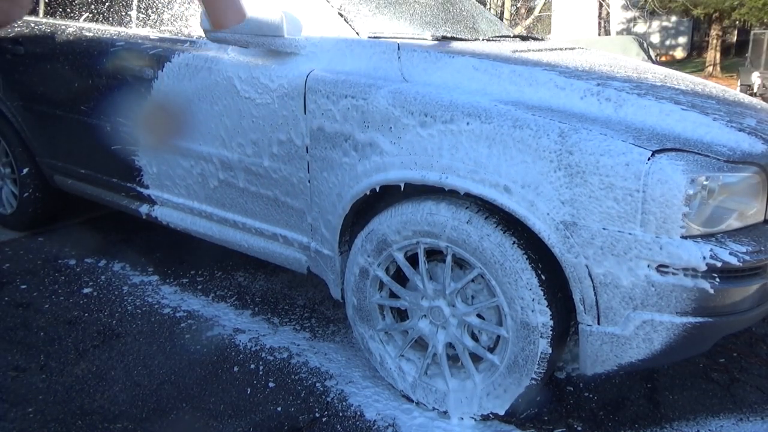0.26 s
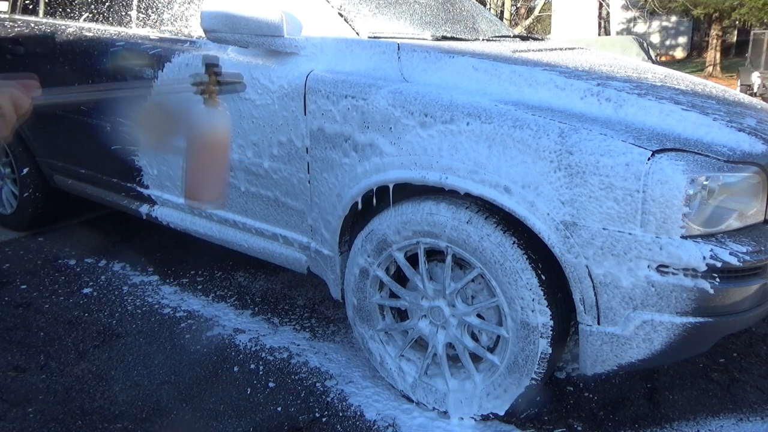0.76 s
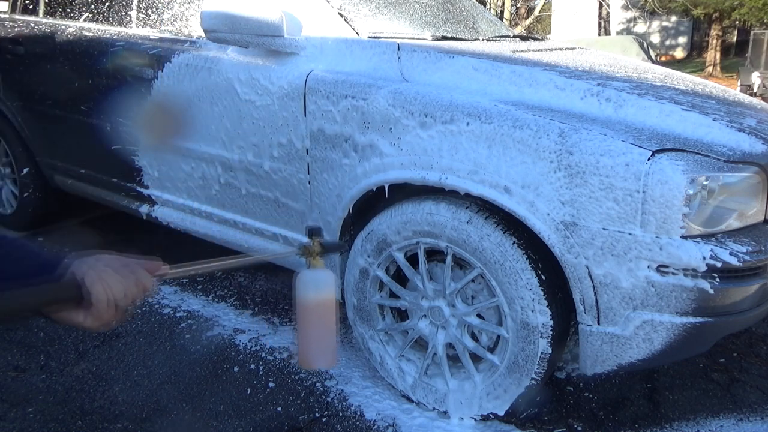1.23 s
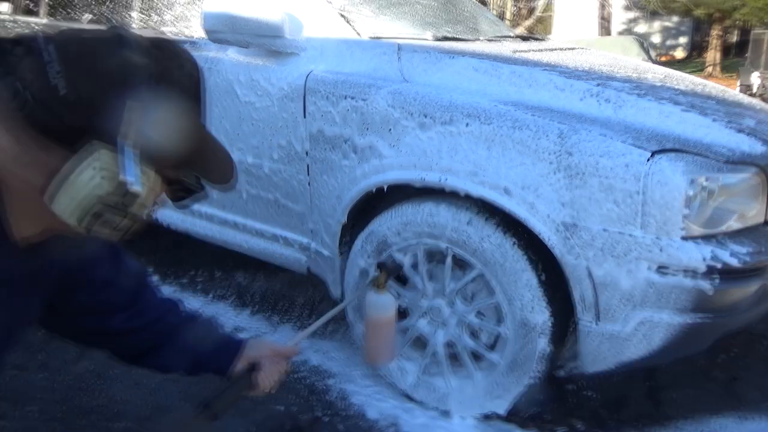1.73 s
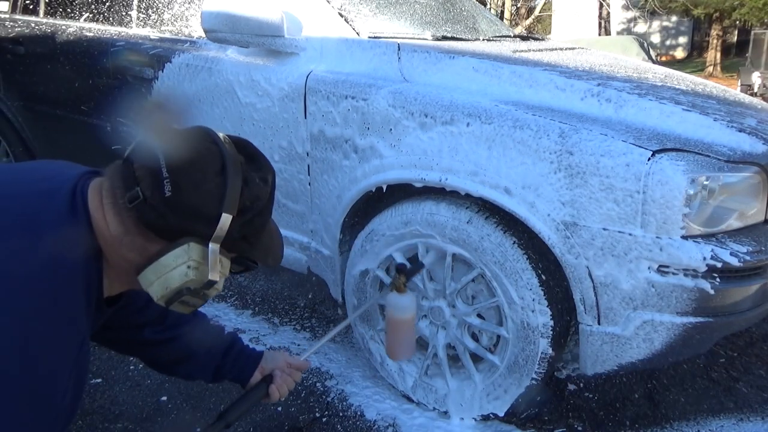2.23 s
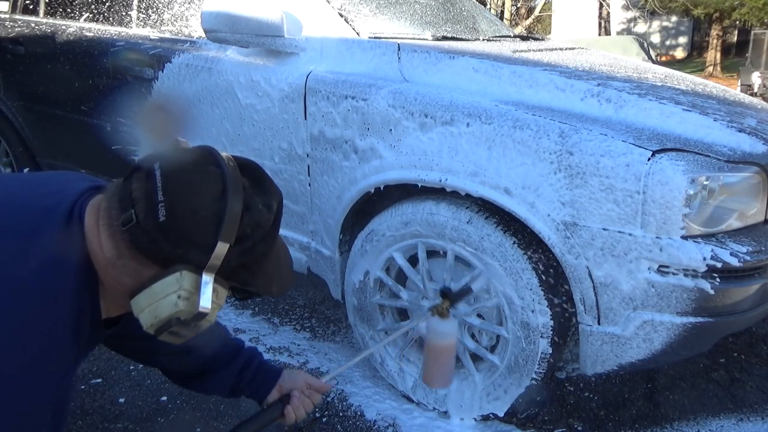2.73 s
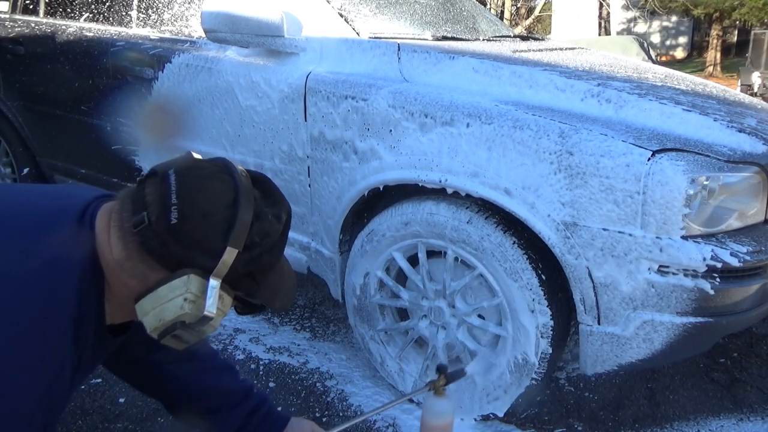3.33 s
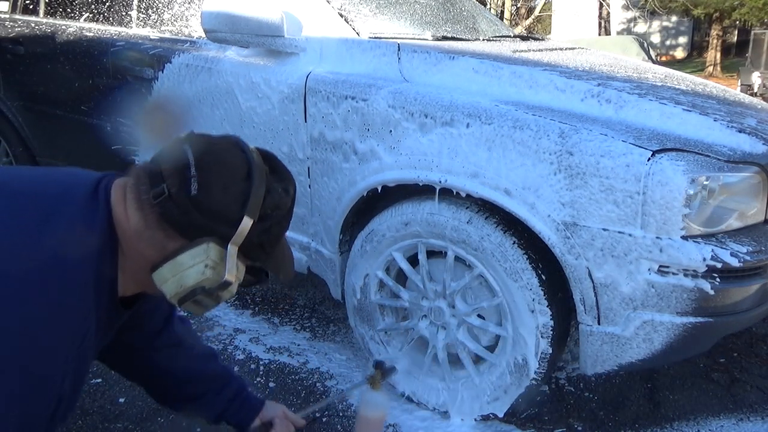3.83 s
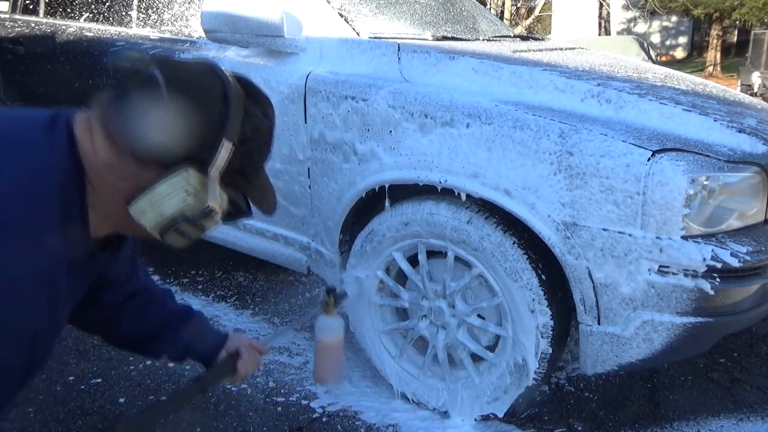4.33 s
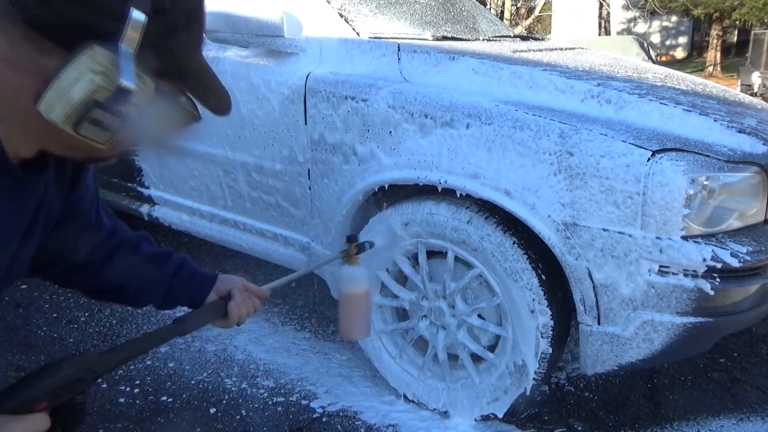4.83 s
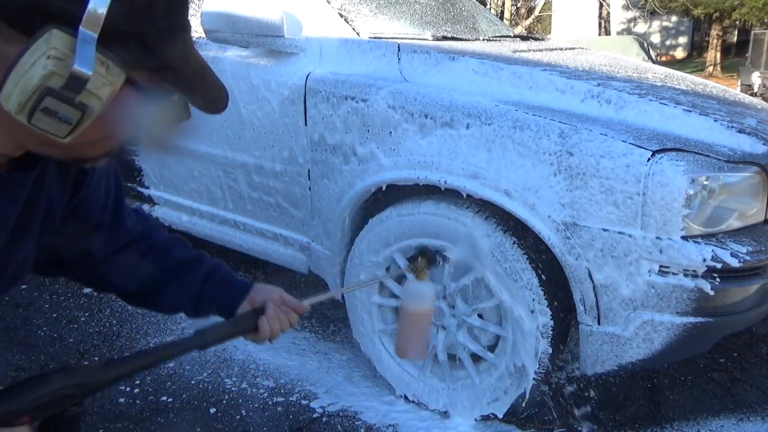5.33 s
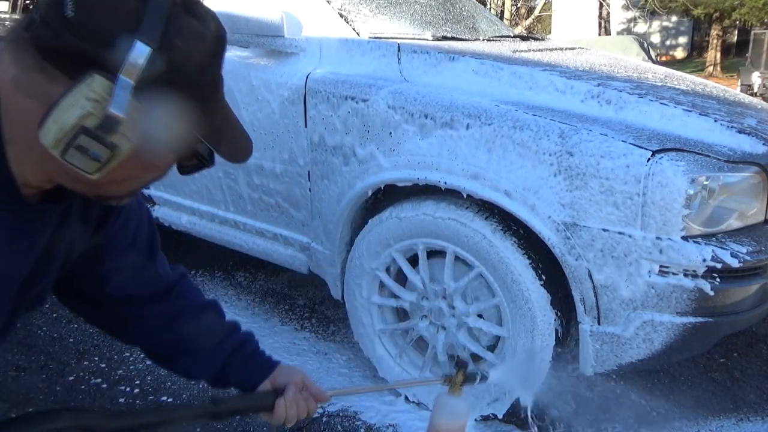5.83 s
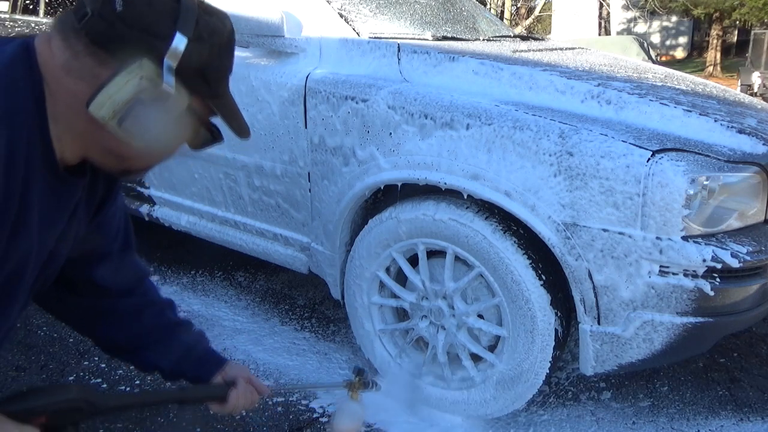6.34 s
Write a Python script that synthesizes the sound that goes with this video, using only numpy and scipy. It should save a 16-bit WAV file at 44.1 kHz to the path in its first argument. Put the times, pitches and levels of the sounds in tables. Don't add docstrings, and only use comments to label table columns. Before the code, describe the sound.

Outdoors and dry, close to a car wheel. From 0 to 1.8 s a small petrol engine driving a pressure washer buzzes a little to the left, firing about thirty times a second. Its speed hunts up and down roughly twice a second, with brief throttle dips near 0.1, 0.55 and 0.95 s, a small hissy sputter around 0.3 s, then steadies. At 1.82 s a hard plastic trigger clacks; instantly a loud, bright foam jet opens. The engine sags, recovers by about 2.4 s and holds slightly lower, duller and quieter behind the spray. The hiss lasts until the end at about 6.6 s, swelling in splashy strikes around 2.2, 3.0, 3.6, 4.3, 5.6 and 6.5 s, with small spits, an airy nozzle singing and short breathy whistles of sucked-in air. It drifts slightly left near 3 s, right near 5.7 s, then back to centre.

```python
import sys
import numpy as np
from scipy import signal
from scipy.fft import rfft, irfft, next_fast_len
from scipy.io import wavfile

SR = 44100
rng = np.random.default_rng(int(sys.argv[2]) if len(sys.argv) > 2 else 0)


def amplitude_ratio(level_db):
    exponent = np.asarray(level_db, float) / 20
    return 10 ** exponent


def generate_wav(sig):
    pcm = np.round(np.clip(np.atleast_2d(sig).T, -1, 1) * 32767).astype(np.int16)
    wavfile.write(sys.argv[1], SR, pcm)


N = 290178

# (multiple of firing rate [1], level [dB])
FREE_ORDERS = [(1, -35), (2, -23), (3, -18.5), (4, -2.5), (5, -2), (6, -14), (7, -4.5), (8, 0.5), (9, -4),
               (10, -10.5), (11, -7.5), (12, 4.5), (13, -15), (14, -4), (15, -14), (16, -2), (17, -10),
               (18, -6.5), (19, -18.5), (20, -9), (21, -14), (22, -21), (23, -20), (24, -8), (25, -22),
               (26, -8), (27, -14), (28, -13), (29, -8), (30, -21), (31, -15), (32, -8), (33, -25),
               (34, -4), (35, -24), (36, -19), (37, -12), (38, -0.5), (39, -9.5), (40, -3), (41, -15),
               (42, 0.5), (43, -16), (44, -7), (45, -10), (46, -12)]
LOADED_ORDERS = [(1, -37), (2, -24), (3, -36), (4, -10.5), (5, -6.5), (6, -12.5), (7, -11), (8, -6),
                 (9, -2.5), (10, -9.5), (11, -10.5), (12, 0.5), (13, -20), (14, -3), (15, -4), (16, -6.5),
                 (17, -7), (18, 4.5), (19, -8.5), (20, -6), (21, -4.5), (22, -2.5), (23, -11.5), (24, -5.5),
                 (25, -10.5), (26, -9), (27, -4), (28, -10), (29, -5.5), (30, -1.5), (31, -10.5), (32, -16),
                 (33, -13), (34, -8), (35, -13), (36, -12.5), (37, -16), (38, -6), (39, -21), (40, -4),
                 (41, -13), (42, -9), (43, -6.5), (44, -4), (45, -7.5), (46, -12)]
# (frequency [Hz], density [dB per Hz])
FREE_ROAR = [(40, -44), (100, -30), (200, -16), (400, -9), (800, 0), (1300, 0), (2100, -4), (3300, -9),
             (4700, -9), (5700, -11), (6700, -18), (8000, -15), (10200, -10), (16500, -12)]
LOADED_ROAR = [(40, -26), (100, -29), (200, -20), (400, -12), (800, -5), (1400, 1.5), (2200, 0.5),
               (2700, -3), (3500, -18), (5000, -28)]
JET = [(1500, -35), (2500, -11.5), (3270, -5.5), (4500, -7), (5700, -8), (6300, -11.5), (6750, -16),
       (7300, -9), (8500, -7.5), (10700, -4), (12500, -6.5), (14500, -11.5), (16500, -15)]
# (frequency [Hz], width [Hz], level [dB])
CASING = [
    (1280, 140, -3.5),
    (9920, 180, -11),
    (10400, 120, -13),
]
# (frequency [Hz], left minus right [dB])
ENGINE_BALANCE = [(60, 5), (110, -6.5), (200, 1.5), (380, 4.5), (700, 4), (1290, 5), (2380, 6.5), (4400, 3),
                  (8120, 0), (15000, -0.5)]
LOADED_BALANCE = [(60, 1), (130, -0.5), (290, 1.0), (640, 2.5), (1410, 3.5), (3100, -1), (6820, 2),
                  (15000, 0.0)]
# (frequency [Hz], likeness [0-1])
ENGINE_LIKENESS = [(60, .95), (130, .93), (290, 1), (640, 0.62), (1410, 0.74), (3100, 0.96), (6820, 0.73),
                   (15000, 0.99)]
LOADED_LIKENESS = [(60, 0.93), (300, 0.94), (700, 0.77), (1400, 0.91), (2000, 0.96), (2700, 0.9)]
JET_LIKENESS = [(2500, 0.99), (16000, 1)]
# (time [s], rate over loaded speed [Hz])
SAG = [
    (1.84, 1.8),
    (1.92, .75),
    (1.97, 0),
    (2.01, -1.25),
    (2.06, -1.65),
    (2.14, -.9),
    (2.22, -.1),
    (2.3, .3),
    (2.47, 0),
]
# (time it reopens [s], closing time [s], closure [0-1])
THROTTLE_SHUTS = [
    (.12, 0.096, 1.01),
    (.55, 0.095, 0.76),
    (.96, 0.048, 0.7),
    (1.45, .1, 0.1),
]
# (time [s], level [dB])
ENGINE_GAIN = [(0, -28.5), (.45, -28), (1.0, -26.5), (1.81, -24), (1.84, -31.5), (2.4, -29.5), (2.8, -31),
               (3.55, -31), (3.68, -28.5), (3.76, -30.5), (4.1, -32), (5.8, -32), (6.58, -30.5)]
# (time [s], hold [s], change [dB])
DUCKS = [
    (0.132, 0.14, -2),
    (1.829, 0.032, -2),
    (2.009, .19, -5),
    (2.473, 0.028, -9),
]
# (time [s], half length [s], rise [dB])
SPUTTERS = [
    (0.31, 0.0055, 3),
    (0.343, .007, 8),
    (.796, 0.0099, 1.5),
]
# (frequency [Hz], level [dB], decay time t60 [s])
TRIGGER_MODES = [
    (1400, -14, .03),
    (1950, -20, .018),
    (4200, -20, .012),
]
# (time [s], hiss level [dB], top of the hiss over it [dB])
FLOW = [(1.86, -17, -7.5), (1.89, -18.5, -5), (2.02, -16.5, -7), (2.66, -18, -8), (2.75, -16, -12),
        (3.11, -18, -7.5), (3.69, -18.5, -8), (3.77, -16.5, -8), (4.57, -18.5, -5), (4.91, -17, -7),
        (6.07, -20, -6.5), (6.08, -19, -8), (6.58, -19.5, -4)]
# (time [s], left minus right [dB])
SWEEP = [(2.6, 1), (3.2, 2), (3.8, 0), (5.3, 0.5), (5.55, -1.8), (5.85, -1.9), (6.2, -1.3), (6.45, 0)]
# (time of peak [s], build-up [s], level [dB], centre [Hz])
STRIKES = [(2.19, 0.3, -27, 4900), (2.5, 0.036, -32, 4900), (2.7, 0.12, -39, 5440), (3.0, 0.36, -26, 4700),
           (3.62, 0.34, -32, 5430), (3.9, 0.13, -34, 5370), (4.319, 0.2, -32, 4630),
           (4.52, 0.051, -39, 5250), (5.15, 0.45, -35.5, 5070), (5.62, 0.21, -31.5, 5000),
           (6.0, 0.094, -39, 5340), (6.5, 0.38, -30.5, 5340)]
# (time [s], half length [s], level [dB], centre [Hz])
GULPS = [(1.978, 0.018, -40, 2130), (2.3, .07, -42, 2120), (2.45, 0.028, -37, 2160),
         (2.61, 0.072, -32, 2130), (2.875, 0.1, -33, 2170), (3.1, .04, -41, 2090), (3.22, 0.033, -30, 2190),
         (3.57, 0.17, -33.5, 2160), (3.72, .04, -36, 2170), (4.032, 0.057, -30, 2220),
         (4.16, .05, -34, 2160), (4.43, 0.1, -33.5, 2170), (4.68, .06, -35, 2160), (4.8, .04, -40, 2140),
         (5.02, .025, -37, 2080), (5.17, 0.036, -35, 2090), (5.28, .03, -39, 2130),
         (5.52, 0.12, -31.5, 2180), (5.98, 0.037, -30, 2150), (6.14, .02, -44, 2060),
         (6.37, 0.19, -34, 2200)]
# (time [s], half length [s], level [dB], centre [Hz])
NOZZLE = [(2.12, .12, -35, 5700), (2.45, .04, -33, 5570), (2.67, .08, -35, 5750), (2.9, .1, -36, 5900),
          (3.05, .05, -39, 5700), (3.36, .08, -36, 6130), (3.52, 0.065, -34, 5500), (3.82, .04, -34, 5800),
          (4.0, .1, -34, 5800), (4.25, .08, -35, 5660), (4.5, .04, -39, 5670), (4.8, .1, -43, 5800),
          (5.1, 0.074, -39, 5900), (5.35, .08, -42, 5570), (5.58, 0.059, -37, 5560), (5.95, .06, -37, 5660),
          (6.3, .1, -35, 6000), (6.55, .06, -33, 5800)]
# (time [s], half length [s], level [dB], centre [Hz])
SPITS = [(2.2, 0.055, -34, 3900), (2.49, 0.017, -31, 4350), (2.79, .07, -34, 5200), (2.89, .05, -34, 4730),
         (3.0, .06, -35, 3900), (3.25, .04, -40, 4800), (3.65, 0.046, -32, 3900), (4.05, 0.045, -38, 4500),
         (4.26, .03, -36, 4750), (4.315, .025, -32, 3900), (4.95, .05, -45, 4000), (5.2, .06, -39, 4500),
         (5.62, .04, -39, 4800), (6.2, .06, -42, 5300), (6.4, .05, -42, 4300)]

TRIGGER_S, JET_OPENS_S = 1.817, 1.832
FREE_HZ, HUNT_HZ, HUNT_PERIOD_S, HUNT_FADES_S, FASTEST_S = 30.75, 1.9, .455, .85, .415
LOADED_HZ, CREEP_HZ_PER_S = 28.95, .075
A_FIRING_S, A_PUMP_STROKE_S = 1.421, 5.104
EXHAUST_FREE_DB, EXHAUST_LOADED_DB = 0.24, -4
DEEP_DB, DEEP_RISE_DB_PER_S = -57.5, 4.5
RAGGED_DB, SETTLED_DB, SETTLES_S = -7, -12.5, 0.88
SHUT_EXHAUST_DB, SHUT_DEEP_DB, SHUT_RAGGED_DB, SHUT_NOTE_DB, SHUT_BYPASS_DB = -2.5, 15, 9, -8, 3
SOFT_DB, FIRMS_S, CHOKE_DB, CHOKE_ENDS_S = -3.5, 0.35, -3, 1.9
BYPASS_DB, BYPASS_FOLLOWS, BYPASS_FLUTTER_DB = -26, 0.68, 1.37
DUCK_ATTACK_S, DUCK_RELEASE_S, DUCK_BASS_SHARE = .015, 0.028, 1.28
REOPEN_SHARE, LEAVE_SHARE = 0.37, 0.18
SPLASH_DB, SPLASH_FOLLOWS, STRIKE_FLOOR_DB = -41.5, 0.35, -44
GULP_FLOOR_DB, WHISTLE_WIDTH_HZ = -53, 170
NOZZLE_FLOOR_DB, NOZZLE_WIDTH_HZ, SPIT_FLOOR_DB, SPIT_WIDTH_HZ = -42, 600, -49, 800


def in_time(rows):
    s, *columns = np.transpose(rows)
    return [np.interp(np.arange(N) / SR, s, column) for column in columns]


def at_hz(points, hz):
    table_hz, values = np.array(points).T
    return np.interp(np.log(hz), np.log(table_hz), values)


def rms_one(x):
    return x / np.sqrt(np.mean(x ** 2))


def drift(rate):
    r = np.exp(-80 * np.pi * rate / SR)
    white = rng.standard_normal(N // 40 + 2002)
    slow = signal.lfilter([1], [1, -2 * r, r * r], white)[2000:]
    return np.interp(np.arange(N) / 40, np.arange(len(slow)), rms_one(slow))


def step_at(s, rise_s):
    return np.clip((np.arange(N) / SR - s) / rise_s, 0, 1)


def bumps(s, half_s, height, fall=1):
    t = np.arange(0, N + 64, 64) / SR
    away = (t - s[:, None]) / half_s[:, None]
    rows = height[:, None] * np.exp(-np.where(away > 0, away / fall, away) ** 2)
    return np.interp(np.arange(N) / SR, t, rows.sum(axis=0))


def swells_db(rows, floor_db, fall=1):
    s, half_s, peak_db = np.transpose(rows)[:3]
    return 10 * np.log10(amplitude_ratio(2 * floor_db) + bumps(s, half_s, amplitude_ratio(2 * peak_db), fall))


def noise(spectrum, levels, likeness, balance, shared_db, patchy_db, count=N):
    size = next_fast_len(count)
    hz = np.maximum(np.arange(size // 2 + 1) * SR / size, 1)
    shape = amplitude_ratio(at_hz(spectrum, hz)) * (hz > spectrum[0][0]) * (hz < spectrum[-1][0])
    mid, side = rfft(rng.standard_normal((2, size))) * shape
    alike = np.clip(at_hz(likeness, hz), 0, 1)
    lean_db = at_hz(balance, hz) / 2
    common, differing = np.sqrt(1 + alike) * mid, np.sqrt(1 - alike) * side
    pair = np.array([amplitude_ratio(sign * lean_db) * (common + sign * differing) / np.sqrt(2) for sign in (1, -1)])
    curves, anchors = [], []
    for low, high, db in levels:
        power = np.sum(shape[(hz > low) & (hz < high)] ** 2) * 2 / size
        curves.append(db - 10 * np.log10(power))
        anchors.append(np.log(np.sqrt(low * high)))
    out = 0
    for centre in np.arange(np.log2(spectrum[0][0]), np.log2(spectrum[-1][0]) + .6, 2 / 3):
        window = np.clip(1 - np.abs(np.log2(hz) - centre) * 1.5, 0, 1)
        weights = [np.interp(centre * np.log(2), anchors, row) for row in np.eye(len(levels))]
        blend_db = sum(w * curve for w, curve in zip(weights, curves))
        level_db = blend_db + shared_db + patchy_db * drift(16)
        out = out + amplitude_ratio(level_db[:count]) * irfft(window * pair, size)[:, :count]
    return np.pad(out, [(0, 0), (0, N - count)])


def resonance(x, hz, width):
    r, out, state = np.exp(-np.pi * width / SR), np.zeros(N), np.zeros(2)
    size = 512 if np.ndim(hz) else N
    hz = np.broadcast_to(hz, N)
    b = np.array([1, 0, -1]) * (1 - r * r) / 2
    for i in range(0, N, size):
        a = [1, -2 * r * np.cos(2 * np.pi * hz[i] / SR), r * r]
        out[i:i + size], state = signal.lfilter(b, a, x[i:i + size], zi=state)
    return out


def resonant_air(hz, width, second_width):
    once = resonance(rng.standard_normal(N), hz, width)
    return rms_one(resonance(once, hz, second_width))


def speed():
    t = np.arange(N) / SR
    swing = np.exp(-t / HUNT_FADES_S) * np.cos(2 * np.pi * (t - FASTEST_S) / HUNT_PERIOD_S)
    free = FREE_HZ + HUNT_HZ * swing * step_at(0, 0.195)
    loaded = LOADED_HZ + CREEP_HZ_PER_S * (t - 1.88) + in_time(SAG)[0]
    return np.where(t < SAG[0][0], free, loaded)


def firings():
    turns = np.cumsum(speed()) / SR
    return turns - turns[round(A_FIRING_S * SR)]


def engine_levels():
    gain_db, = in_time(ENGINE_GAIN)
    duck_db = 0
    for s, hold_s, db in DUCKS:
        duck_db = duck_db + db * (step_at(s, DUCK_ATTACK_S) - step_at(s + hold_s, DUCK_RELEASE_S))
    shut = bumps(*np.transpose(THROTTLE_SHUTS), REOPEN_SHARE)

    over_db = np.where(np.arange(N) < TRIGGER_S * SR, EXHAUST_FREE_DB, EXHAUST_LOADED_DB)
    low_db = gain_db + over_db + DUCK_BASS_SHARE * duck_db + SHUT_EXHAUST_DB * shut
    note_db = low_db + SHUT_NOTE_DB * shut
    choke = step_at(TRIGGER_S, 0.022) - step_at(CHOKE_ENDS_S, 0.032)
    upper_db = SOFT_DB * (1 - step_at(0, FIRMS_S)) + CHOKE_DB * choke
    casing_db = gain_db + duck_db
    bypass_db = BYPASS_DB + BYPASS_FOLLOWS * (gain_db + 27) + duck_db + BYPASS_FLUTTER_DB * drift(22)
    bypass_db = bypass_db + SHUT_BYPASS_DB * shut + bumps(*np.transpose(SPUTTERS))
    deep_db = DEEP_DB + DEEP_RISE_DB_PER_S * np.arange(N) / SR + SHUT_DEEP_DB * shut
    ragged_db = RAGGED_DB + (SETTLED_DB - RAGGED_DB) * step_at(SETTLES_S, 0.13) + SHUT_RAGGED_DB * shut
    return low_db, note_db, upper_db, casing_db, bypass_db, deep_db, ragged_db


def exhaust(turns, orders, deep_db, upper_db, balance, smear, wobble_db, bass_lag, way):
    k, level_db = np.transpose(orders)
    mirrored_db = np.r_[level_db[0], level_db, level_db[::-1]]
    log_size = np.log(amplitude_ratio(np.maximum(mirrored_db, -20)))
    ring_after = -np.imag(signal.hilbert(log_size))[1:len(k) + 1]
    phase = ring_after + smear * np.sqrt(k) * rng.standard_normal(len(k))
    phase = way * phase - 2 * np.pi * k * bass_lag * (k < 7.5)
    at = np.arange(4097) / 4096
    waves = np.cos(2 * np.pi * k[:, None] * at + phase[:, None])
    height = amplitude_ratio(level_db) * np.sqrt(2 / np.sum(amplitude_ratio(level_db) ** 2))
    side_db = at_hz(balance, 30 * k) / 2
    groups = np.digitize(k, [3.5, 10.5, 19.5, 30.5])
    group_db = [deep_db, 0, upper_db, upper_db, upper_db]
    out = np.zeros((2, N))
    for group in range(5):
        swell = amplitude_ratio(wobble_db * group * drift(4.2) + group_db[group])
        for channel, sign in enumerate((1, -1)):
            cycle = (height * amplitude_ratio(sign * side_db) * (groups == group)) @ waves
            out[channel] += swell * np.interp(turns % 1, at, cycle)
    return out


def engine():
    low_db, note_db, upper_db, casing_db, bypass_db, deep_db, ragged_db = engine_levels()
    turns = firings()
    load = step_at(JET_OPENS_S, .006)
    kick = step_at(TRIGGER_S, .006)
    throb = np.cos(2 * np.pi * turns - .4) + 1.6 * np.cos(4 * np.pi * turns - .4)
    uneven = drift(40)

    free_levels = [(106, 334, low_db + ragged_db), (646, 1280, casing_db - 2.2),
                   (2980, 14200, bypass_db - .6)]
    free = noise(FREE_ROAR, free_levels, ENGINE_LIKENESS, ENGINE_BALANCE,
                 0.37 * throb + 0.13 * uneven, patchy_db=1.0, count=2 * SR)
    free_note = exhaust(turns, FREE_ORDERS, deep_db - note_db + 27.0, upper_db,
                        np.multiply(ENGINE_BALANCE, [1, .93]),
                        wobble_db=.4, smear=.04, bass_lag=0, way=1)
    free += (1 - kick) * amplitude_ratio(note_db + 0.45 + 0.23 * uneven) * free_note
    for hz, width, level_db in CASING:
        ring = rms_one(resonance(rng.standard_normal(N), hz, width))
        free += ring * amplitude_ratio(casing_db + level_db + 1.0 * throb) * amplitude_ratio([[1.2], [-1.2]])

    loaded_levels = [(105, 530, low_db - 10.5), (706, 1800, casing_db - 2.5)]
    loaded = noise(LOADED_ROAR, loaded_levels, LOADED_LIKENESS, LOADED_BALANCE,
                   0.53 * throb + 0.5 * uneven, patchy_db=0.93)
    pump_turns = turns - turns[round(A_PUMP_STROKE_S * SR)]
    loaded_note = amplitude_ratio(note_db + 3.0 + 0.092 * uneven) * exhaust(
        pump_turns, LOADED_ORDERS, .1, upper_db, LOADED_BALANCE,
        wobble_db=.3, smear=.18, bass_lag=.43, way=-1)
    return (1 - load) * free + load * loaded - kick * loaded_note


def trigger():
    clicks, out = np.zeros(N) + 1e-18, 0
    contacts = np.round((TRIGGER_S + np.array([0, .004, .009])) * SR).astype(int)
    clicks[contacts] = amplitude_ratio([0, -2.5, -5]) * [1, -1, 1]
    for hz, level_db, t60 in TRIGGER_MODES:
        r, w = amplitude_ratio(-60 / (t60 * SR)), 2 * np.pi * hz / SR
        mode = signal.lfilter([0, np.sin(w)], [1, -2 * r * np.cos(w), r * r], clicks)
        out = out + amplitude_ratio(level_db) * mode
    return out


def singing(rows, floor_db, width, flutter_db):
    centre_hz = in_time(np.array(rows)[:, [0, 3]])[0]
    air = resonant_air(centre_hz, width, width)
    return air * amplitude_ratio(swells_db(rows, floor_db) + flutter_db * drift(25))


def intake_whistle():
    level_db = swells_db(GULPS, GULP_FLOOR_DB)
    centre_hz = in_time(np.array(GULPS)[:, [0, 3]])[0] + 25 * drift(10)
    breath = resonant_air(centre_hz, WHISTLE_WIDTH_HZ, WHISTLE_WIDTH_HZ)
    return breath * amplitude_ratio(level_db - 1.0 + 1.0 * drift(28))


def lance():
    hiss_db, aim_db = in_time(FLOW)
    top_db = hiss_db + aim_db
    strike_db = swells_db(STRIKES, STRIKE_FLOOR_DB, LEAVE_SHARE)
    strike_hz = in_time(np.array(STRIKES)[:, [0, 3]])[0]
    splash_db = SPLASH_DB + SPLASH_FOLLOWS * (strike_db + 32.5)
    pump_pulse = 0.33 * np.cos(4 * np.pi * firings())
    surge = pump_pulse + 0.12 * drift(11) + 0.2 * drift(45) + 0.56 * drift(200)

    levels = [(2610, 3344, splash_db - .2), (7300, 14500, hiss_db - .2), (13270, 14800, top_db - .2)]
    jet = noise(JET, levels, JET_LIKENESS, [(100, 0), (200, 0)], surge, patchy_db=0.8)
    whistle = intake_whistle()
    strike = resonant_air(strike_hz, 1900, 1800) * amplitude_ratio(strike_db - 6.0 + surge)
    nozzle = singing(NOZZLE, NOZZLE_FLOOR_DB, NOZZLE_WIDTH_HZ, 1.8)
    spits = singing(SPITS, SPIT_FLOOR_DB, SPIT_WIDTH_HZ, 2.1)
    lean = amplitude_ratio(in_time(SWEEP)[0] * [[.5], [-.5]])
    return step_at(JET_OPENS_S, 0.00099) * (lean * jet + whistle + strike + nozzle + spits)


def scene():
    return engine() + trigger() + lance()


def top_cut(x):
    return signal.sosfilt(signal.butter(12, 15900, fs=SR, output="sos"), x)


def record(dry):
    low_pass = signal.ellip(14, .3, 70, 15800, fs=SR, output="sos")
    mix = signal.sosfilt(low_pass, dry)
    return top_cut(mix)


dry = scene()
out = record(dry)
generate_wav(out)
```